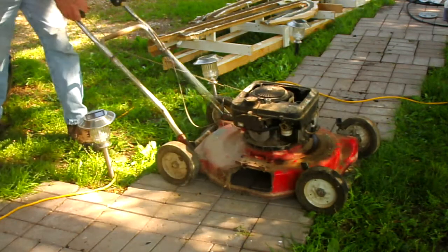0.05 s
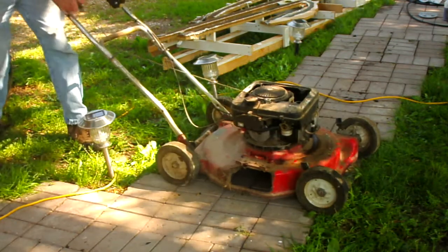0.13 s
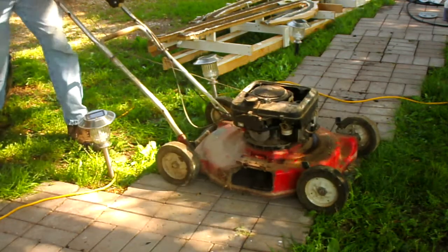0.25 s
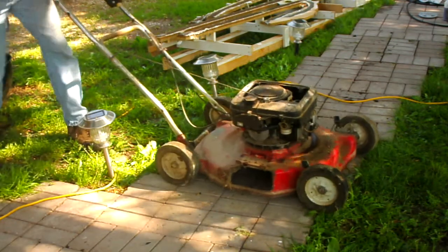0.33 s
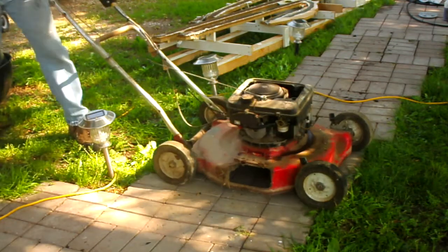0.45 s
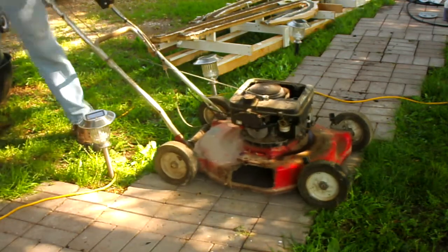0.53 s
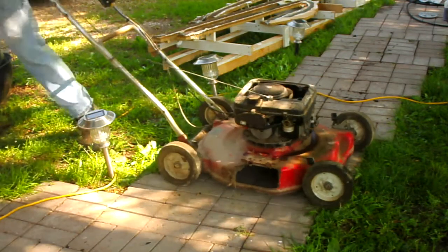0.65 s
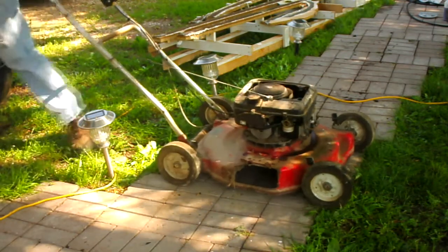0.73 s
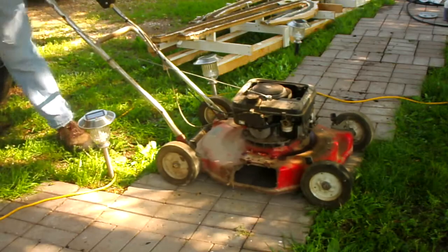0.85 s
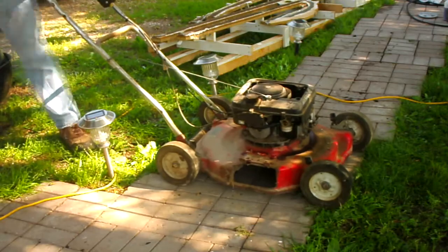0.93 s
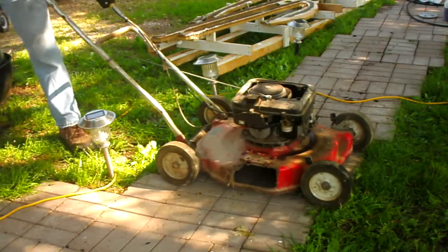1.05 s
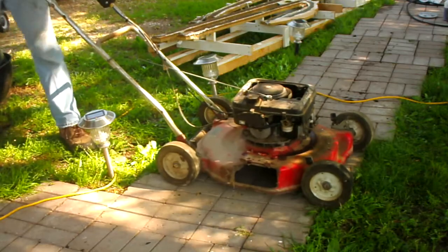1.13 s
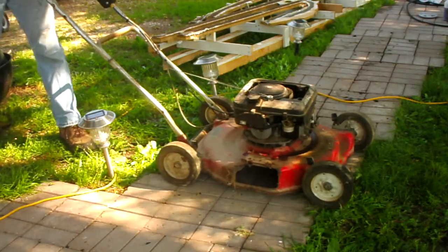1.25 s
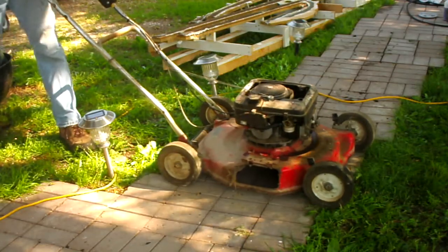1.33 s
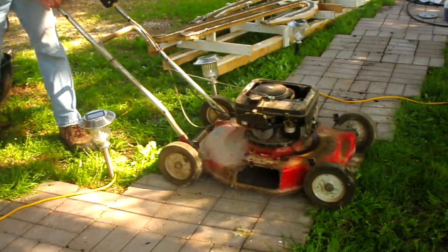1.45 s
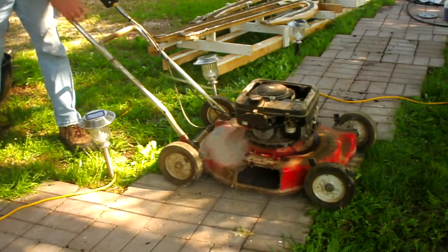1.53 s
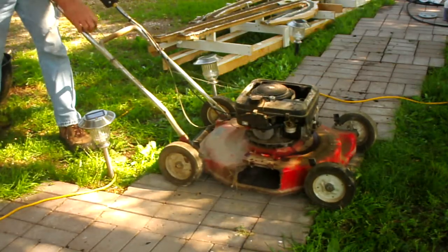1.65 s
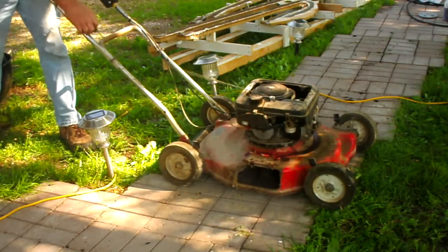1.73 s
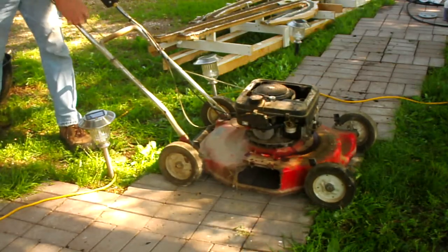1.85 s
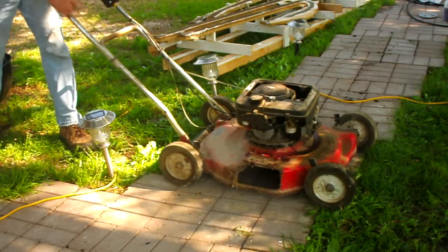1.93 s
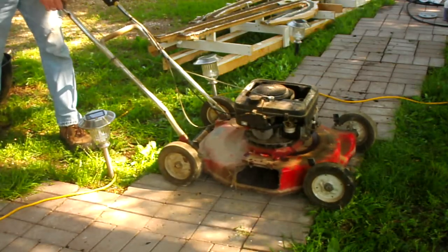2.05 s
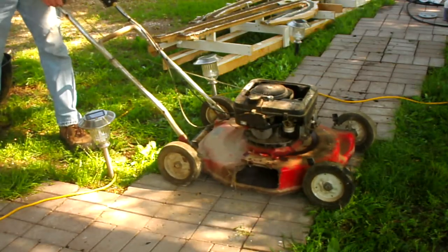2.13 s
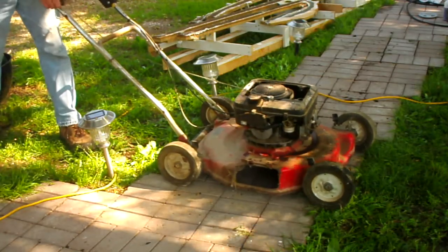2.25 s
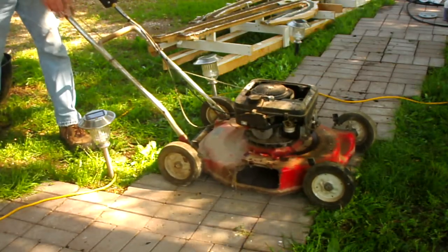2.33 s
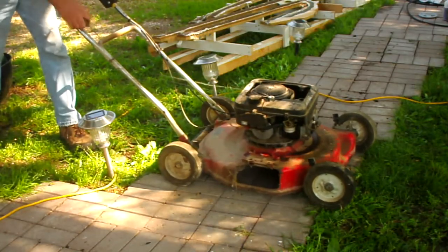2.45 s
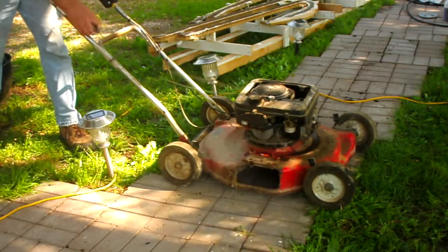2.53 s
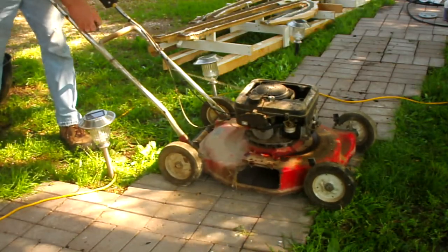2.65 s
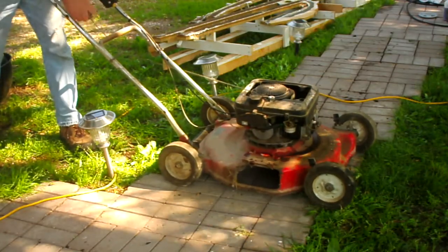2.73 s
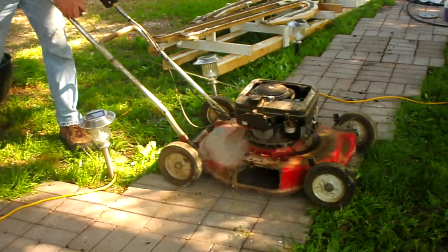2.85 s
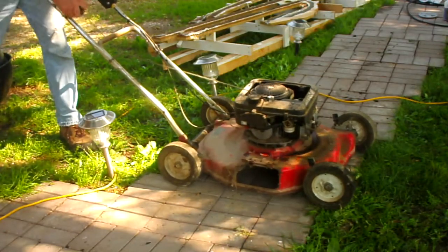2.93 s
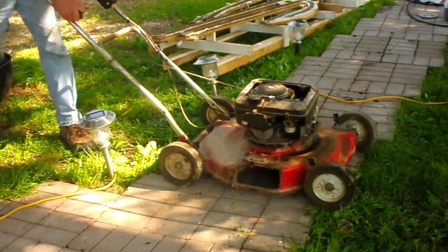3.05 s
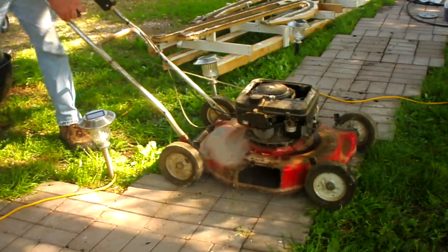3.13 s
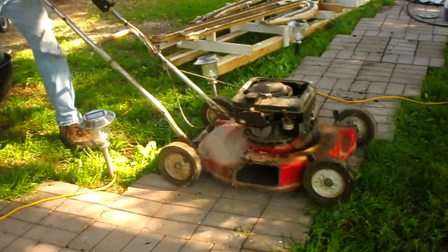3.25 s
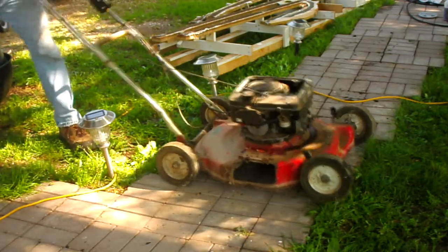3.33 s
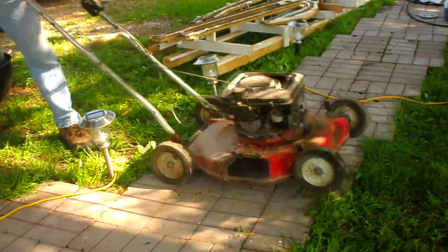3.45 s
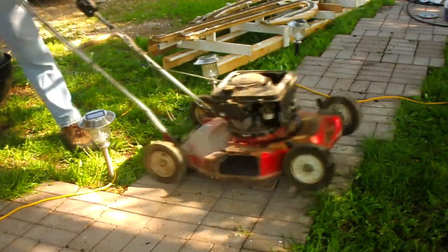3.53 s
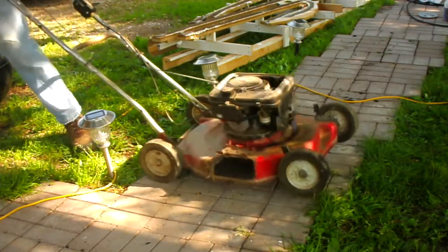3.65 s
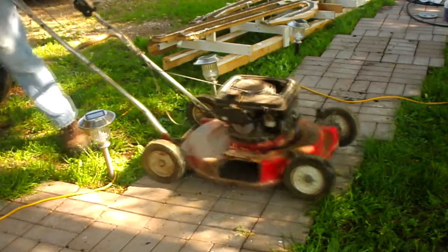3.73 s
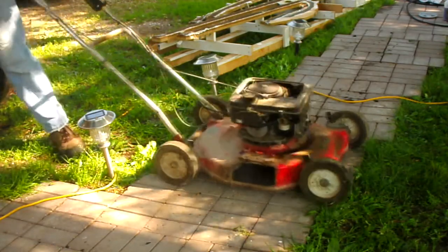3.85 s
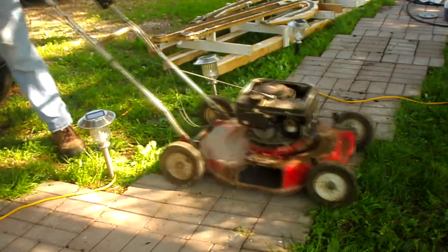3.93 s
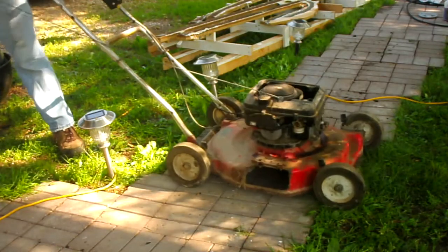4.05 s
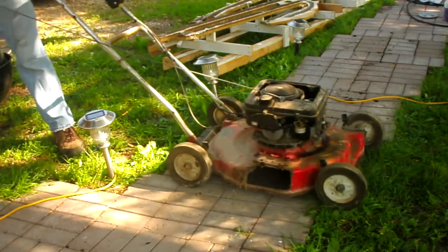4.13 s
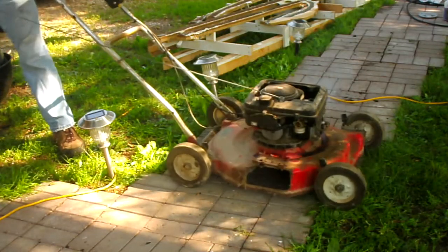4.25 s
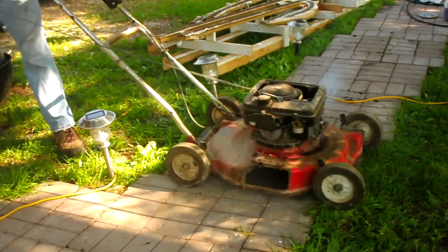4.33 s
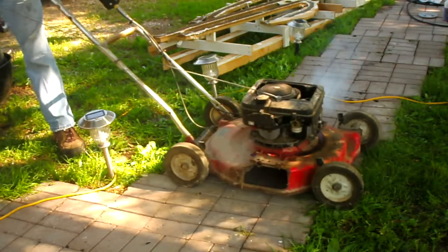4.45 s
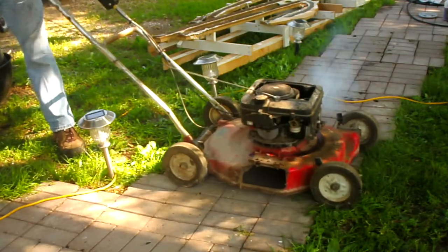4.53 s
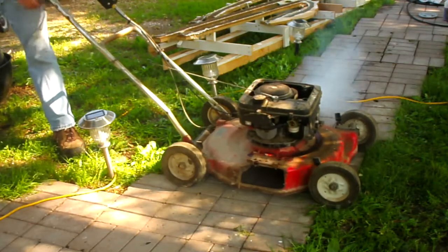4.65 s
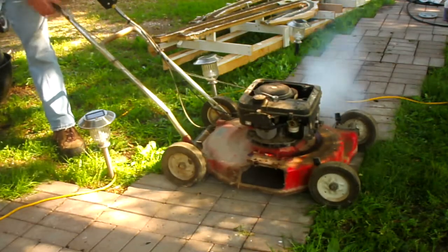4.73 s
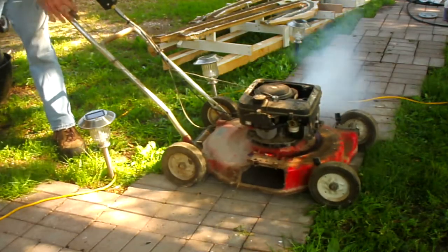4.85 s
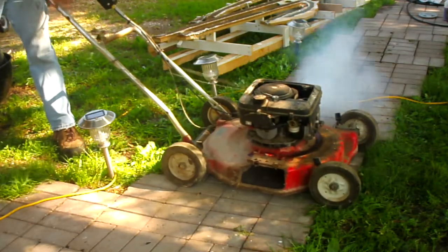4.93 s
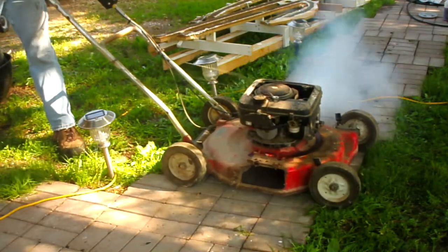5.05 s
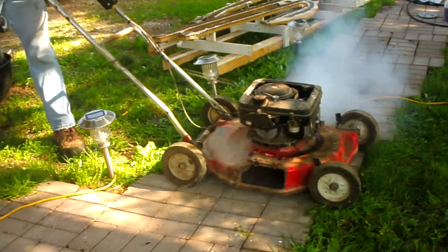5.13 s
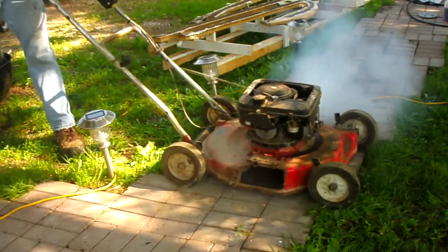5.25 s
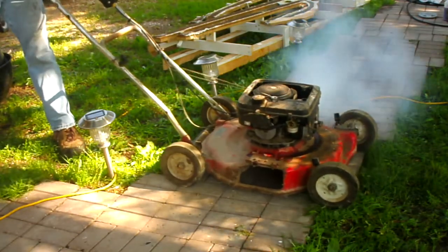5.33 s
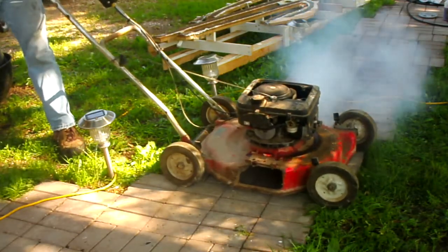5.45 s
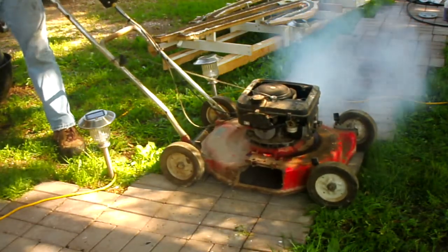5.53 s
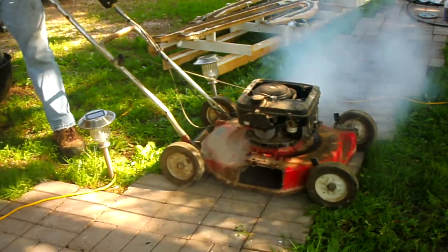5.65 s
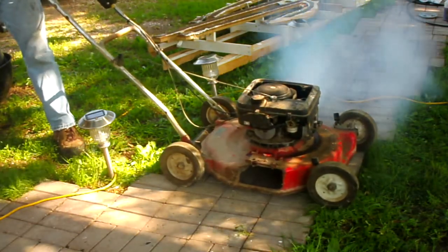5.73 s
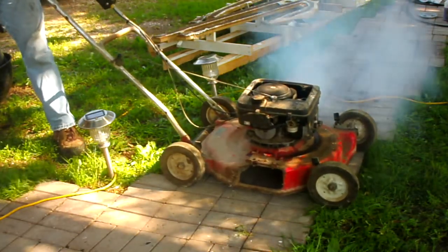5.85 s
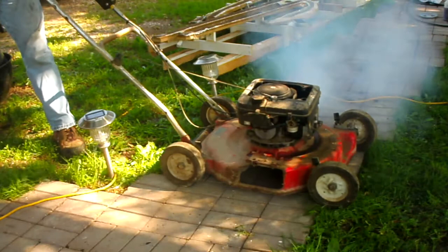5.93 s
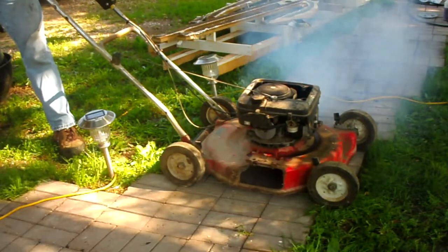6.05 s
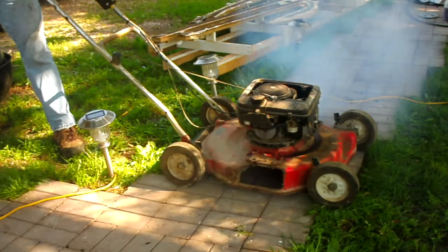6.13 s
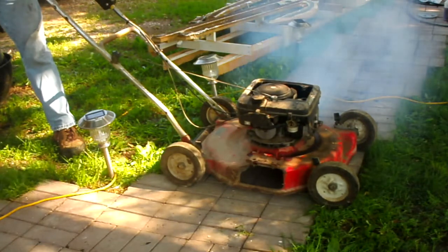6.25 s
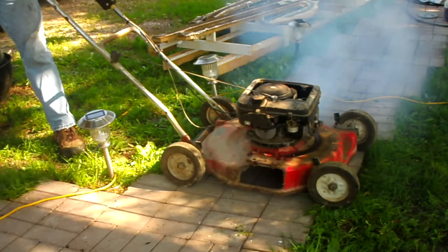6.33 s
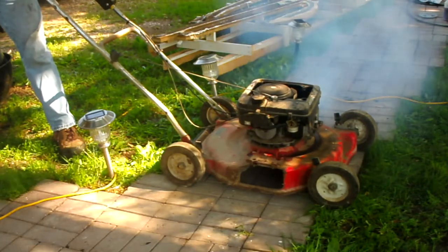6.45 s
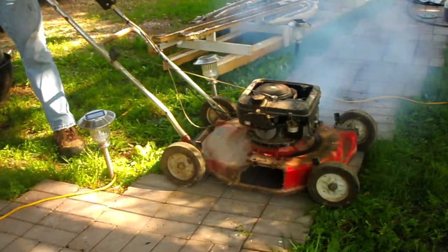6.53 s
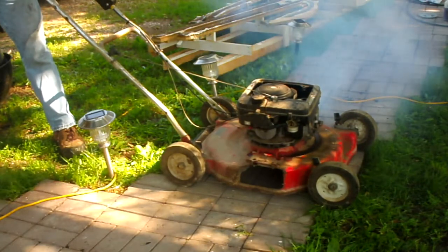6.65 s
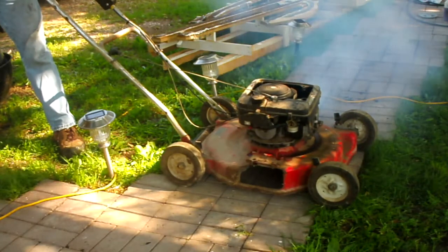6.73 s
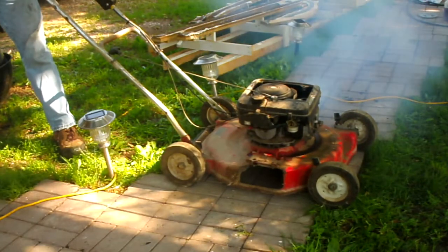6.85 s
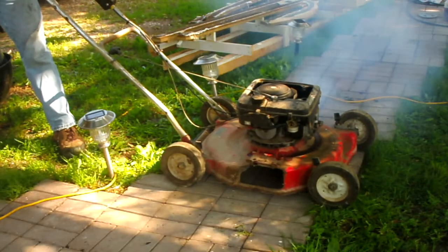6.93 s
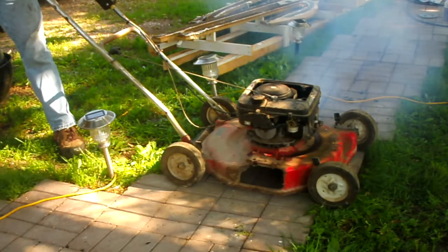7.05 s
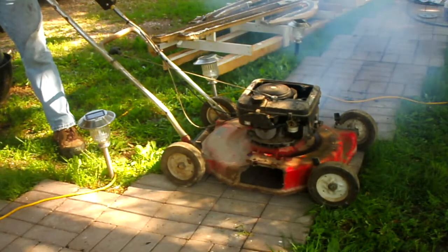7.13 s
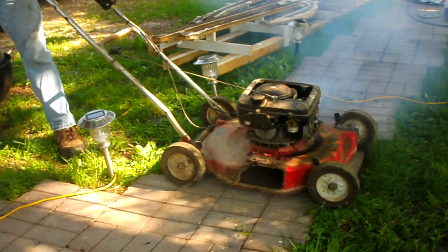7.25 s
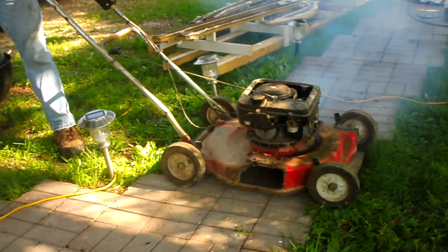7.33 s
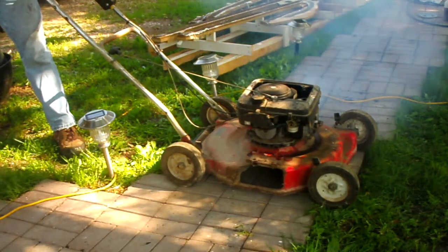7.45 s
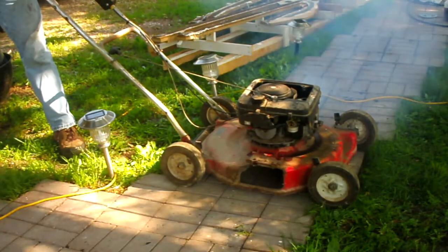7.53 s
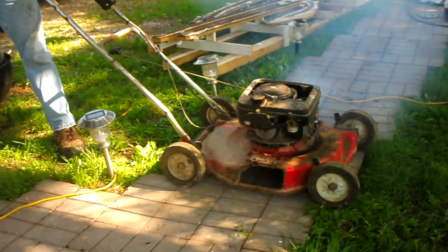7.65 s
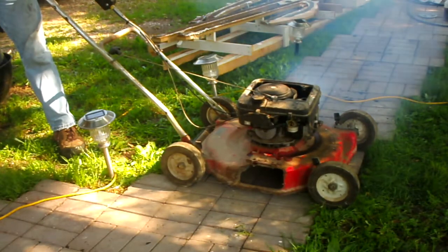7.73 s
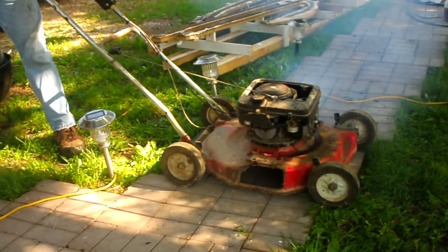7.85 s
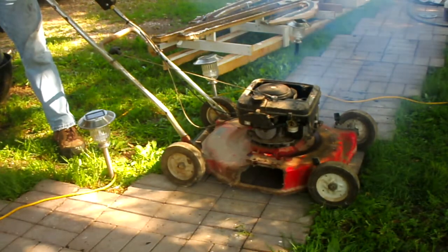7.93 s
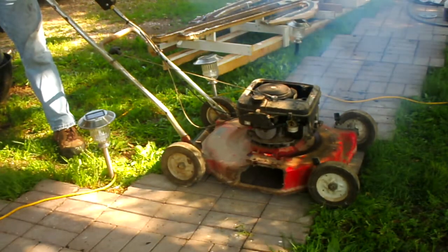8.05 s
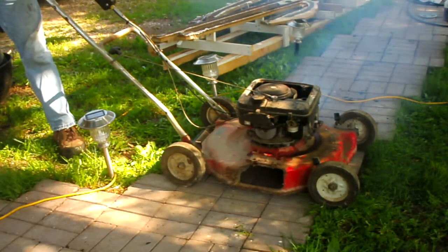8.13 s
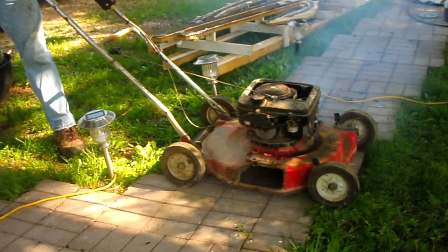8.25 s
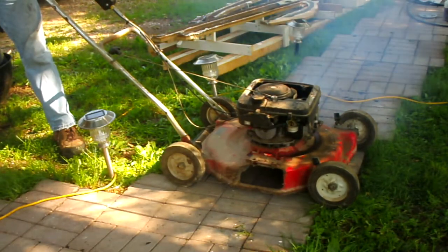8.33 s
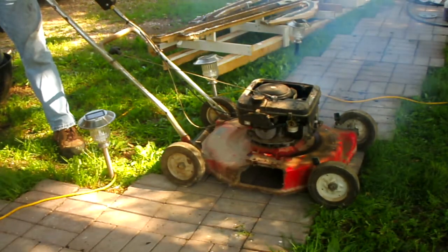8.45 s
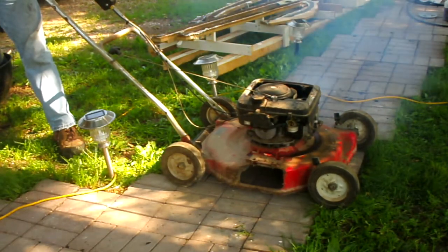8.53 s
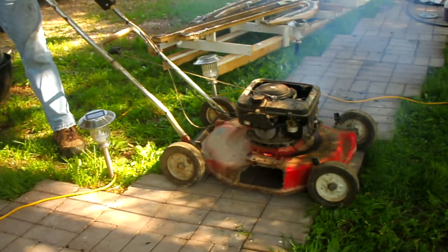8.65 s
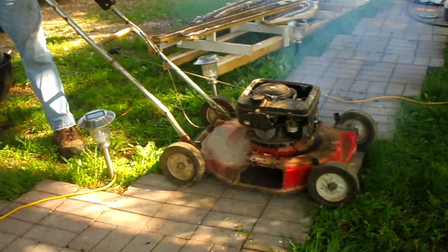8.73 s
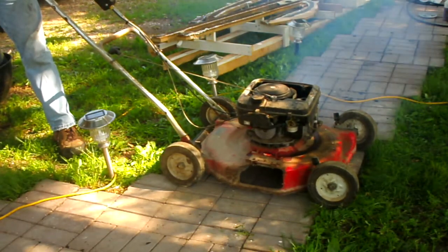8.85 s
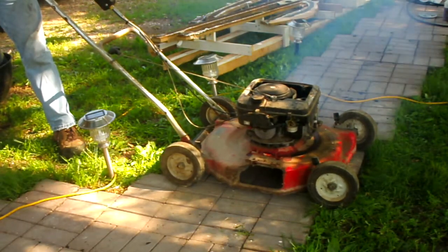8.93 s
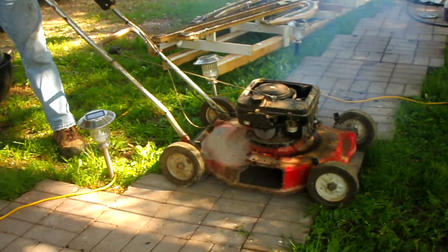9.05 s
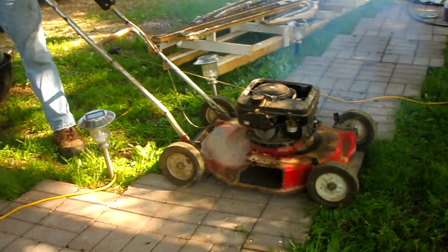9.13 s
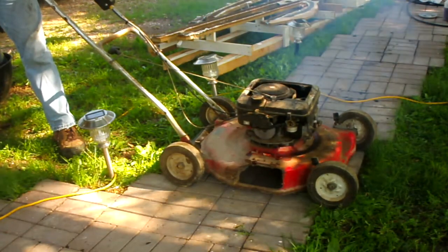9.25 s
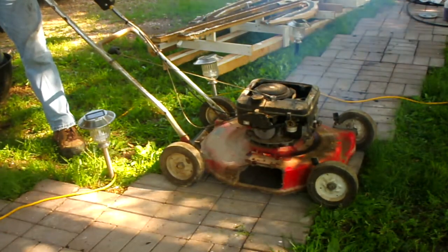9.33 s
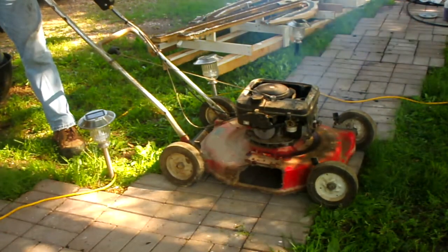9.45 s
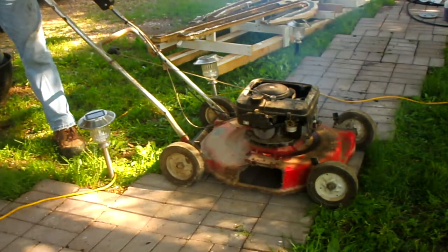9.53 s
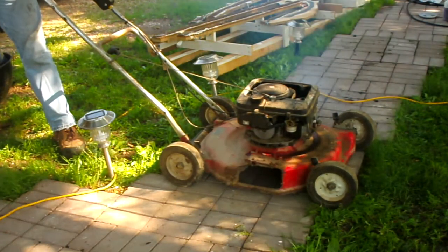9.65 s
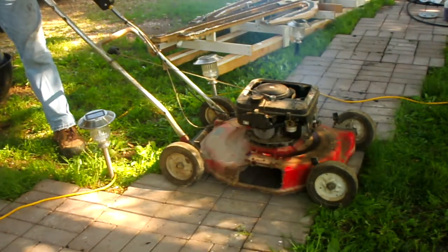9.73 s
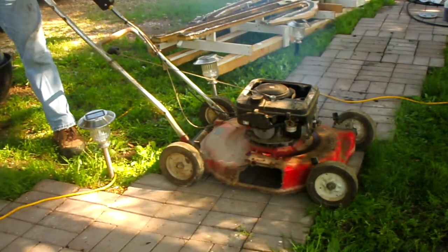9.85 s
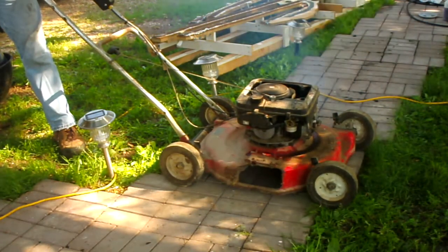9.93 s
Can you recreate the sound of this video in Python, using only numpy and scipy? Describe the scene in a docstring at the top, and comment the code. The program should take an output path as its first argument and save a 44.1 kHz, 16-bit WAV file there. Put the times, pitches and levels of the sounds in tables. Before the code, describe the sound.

Failed pull-start with ratchety rasp and metallic clatter, a quiet pause, then another pull and a mower engine puffs, climbs and drones loudly.

```python
"""A rope rasps and clacks as a petrol lawn mower is pull-started on a paved garden path: the first pull fails.
On the second the single cylinder puffs and runs up to speed, and the blade hums and roars in its deck.
Near the end the beat smooths out and the sound softens; the close microphone overloads a little.
The engine is tones and shaped noise tied to one crank angle; the starter is random tiny contacts and noise
ringing in metal; clacks and thuds are short noise bursts; the garden is quiet coloured noise."""
import sys
import numpy as np
from scipy import signal
from scipy.fft import rfft, irfft
from scipy.io import wavfile

SR = 44100
rng = np.random.default_rng(int(sys.argv[2]) if len(sys.argv) > 2 else 0)


def to_wav(sig):
    """Store sig (one row per channel, or 1-D mono) as 16-bit WAV at the path in sys.argv[1].

    Samples outside -1..1 are clipped; the rate is SR.
    """
    pcm = np.clip(np.atleast_2d(sig), -1, 1) * 32767
    pcm = np.round(pcm).astype(np.int16)
    wavfile.write(sys.argv[1], SR, pcm.T)  # frames by channels


N = 440559
TIME = np.arange(N) / SR
SMOOTH_FROM_S = 9.235   # from here the beat is smoother

# Resonances of the muffler shell. Each row: centre in Hz, width in Hz, peak in dB.
MUFFLER = [(4970, 200, 10), (5745, 300, 11.5), (6490, 113, 9), (6735, 740, 11.5), (7960, 260, 8.5),
           (8550, 200, 8), (9740, 220, 3), (12400, 400, 6), (13800, 370, 8)]


def from_db(db):
    """Turn decibels into gain."""
    return 10 ** (np.asarray(db) / 20)


def rms_one(x):
    """Scale a sound to an rms (average strength) of one."""
    return x / np.sqrt(np.mean(x ** 2) + 1e-20)


def drift(rate):
    """Random wandering with unit rms: straight lines between rate points a second, still after 4000 points."""
    return rms_one(np.interp(TIME * rate, np.arange(4000), rng.standard_normal(4000)))


def colour(x, spectrum, resonances=()):
    """Give a sound a broad spectrum with resonant peaks on it, at unit rms."""
    hz = np.arange(N // 2 + 1) * SR / N
    points = np.array(spectrum)
    level_db = np.interp(np.log(hz + 1), np.log(points[:, 0]), points[:, 1])
    for centre, width, peak_db in resonances:
        level_db = level_db + peak_db / (1 + (2 * (hz - centre) / width) ** 2)
    return rms_one(irfft(rfft(x) * from_db(level_db), N))


def noise(spectrum, resonances=()):
    """Random noise, as moving air makes, with a chosen spectrum."""
    return colour(rng.standard_normal(N), spectrum, resonances)


def resonate(x, hz, width_hz):
    """Ring at one pitch, with about unit gain at the peak; a narrower resonance rings longer."""
    r = np.exp(-np.pi * width_hz / SR)
    top = np.array([1, 0, -1]) * (1 - r * r) / 2
    return signal.lfilter(top, [1, -2 * r * np.cos(2 * np.pi * hz / SR), r * r], x)


def cut(x, hz, kind, order=2):
    """Keep what lies above ("high") or below ("low") a frequency."""
    return signal.sosfilt(signal.butter(order, min(hz, .45 * SR), kind, fs=SR, output="sos"), x)


def low_part(x, hz):
    """Keep the lows without delay, by filtering forwards and then backwards."""
    return cut(cut(x, hz, "low")[::-1], hz, "low")[::-1]


def fade(x, time_s):
    """Let each impulse die away exponentially."""
    return signal.lfilter([1], [1, -np.exp(-1 / (time_s * SR))], x)


def add(out, s, sound):
    """Mix a sound in at time s."""
    at = int(s * SR)
    out[at:at + len(sound)] += sound[:N - at]


def grains(per_s, spread_db):
    """Tiny contacts at random moments, of uneven size when spread_db is above zero."""
    size = from_db(spread_db * np.minimum(rng.exponential(1, N), 4))
    return (rng.random(N) < per_s / SR) * size * rng.choice([-1, 1], N) + 1e-18


def housing(x):
    """The steel housing rings at its resonances."""
    # Each row: centre in Hz, width in Hz, peak in dB over a direct sound at 0 dB.
    steel_modes = [(1100, 240, 4.5), (1580, 170, 4.5), (1980, 150, 8), (3280, 1600, 7), (4100, 150, 5.5),
                   (4760, 360, 3.5), (6000, 1200, 6), (7420, 250, 3)]
    return sum((from_db(db) - 1) * resonate(x, centre, width) for centre, width, db in steel_modes)


def background(garden_db=-43, hiss_db=-49, whine_hz=7867, whine_db=-45.5):
    """Quiet outdoor air and a hiss are coloured noise; a thin whine is one steady tone."""
    # Outdoor air. Each row: frequency in Hz, relative level in dB.
    air_spectrum = [(18, -39), (30, -7.5), (218, -3), (250, -4.5), (474, -5), (609, -6), (668, -7.5),
                    (783, -6), (7000, -24.5), (9100, -56), (15400, -120)]
    air = noise(air_spectrum)
    hiss = noise([(100, -15), (3000, 4.5), (8000, 0.5), (11000, -1.5), (15500, -6)])
    whine = np.sin(2 * np.pi * whine_hz * TIME)
    return from_db(garden_db) * air + from_db(hiss_db) * hiss + from_db(whine_db) * whine


def bumps(t60=0.09, width_share=0.39):
    """Feet and wheels bump softly: noise falling 60 dB in t60 seconds rings at one hollow pitch."""
    # Each row: start in seconds, peak in dB, pitch in Hz.
    soft_bumps = [(.285, -38, 90), (.535, -28, 200), (0.797, -33, 147), (2.25, -38, 100), (2.325, -34, 130),
                  (4.036, -38, 130)]
    out, t = np.zeros(N), TIME[:SR // 4]
    for s, db, hz in soft_bumps:
        burst = rng.standard_normal(len(t)) * from_db(-60 * t / t60)
        thud = cut(resonate(burst, hz, width_share * hz), 2 * hz, "low")
        add(out, s, from_db(db) * thud / np.abs(thud).max())
    return out


def contact(peak_db, hz, t60, broad_db, top_hz,
            rise_s=0.00061, ring_share=0.19, tail_db=-24, tail_t60=0.46, low_hz=620):
    """A contact chatters briefly in the housing, strongest near its own ring; the yard returns a faint tail."""
    t = TIME[:SR // 2]
    decay = from_db(-60 * t / t60) + from_db(tail_db - 60 * t / tail_t60)
    chatter = rng.standard_normal(len(t)) * (1 - np.exp(-t / rise_s)) * decay
    steel = chatter + housing(chatter)
    ring = 2 * resonate(steel, hz, ring_share * hz)
    broad = from_db(broad_db) * cut(steel, low_hz, "high")
    hit = cut(ring + broad, top_hz, "low")
    return from_db(peak_db) * hit / np.abs(hit).max()


def clacks(clack_db=1.5, tick_db=-2, knock_db=-0.2, clack_top_hz=7250):
    """Hard clacks each have their own ring; the ticks are bright and alike, the knocks dull and hollow."""
    # In all three tables the peak is relative: the kind's own dB setting above is added to it.
    # Pawls, handle and shaking engine. Each row: start in seconds, relative peak in dB, main ring in Hz,
    # time to fall 60 dB in seconds, broad chatter in dB.
    hard_clacks = [(.2375, -2.5, 1930, 0.072, 7), (.7322, 0.5, 2920, 0.048, 21),
                   (1.389, -21.5, 2900, 0.12, 5), (1.953, -20, 1210, .09, -5),
                   (3.159, -22, 1970, 0.046, -9), (3.2385, -3, 1680, 0.079, 1),
                   (3.7836, 0, 1430, 0.051, 11), (3.812, -1.5, 3000, 0.037, 2), (3.822, -7, 2950, .035, 10),
                   (4.397, -9.5, 1390, 0.05, -2), (4.521, -12, 7000, 0.13, -12),
                   (4.562, -5, 1540, 0.079, 4), (4.654, -13, 2500, .053, -1), (4.713, -7.5, 4020, .06, -2)]
    # Light ticks of the recoil ratchet. Each row: start in seconds, relative peak in dB.
    ratchet_ticks = [(.4515, -19), (.701, -13), (.801, -18), (.838, -26), (0.916, -17), (1.047, -18.5),
                     (1.223, -20.5), (1.447, -23), (1.718, -20), (1.884, -22), (2.414, -23), (2.743, -21.5),
                     (3.021, -30), (3.474, -17.5), (3.688, -14.5), (3.771, -11)]
    # Knocks of the handle on the deck. Each row: start in seconds, relative peak in dB, ring in Hz.
    handle_knocks = [(.643, -14, 1060), (.658, -18, 1360), (0.857, -14, 1400), (.943, -24, 1400),
                     (1.069, -23.5, 1900), (1.13, -20.5, 1220), (1.667, -28, 1240), (2.364, -30, 1130),
                     (2.812, -24, 1130)]
    out = np.zeros(N)
    for s, db, hz, t60, broad_db in hard_clacks:
        add(out, s, contact(db + clack_db, hz, t60, broad_db, clack_top_hz))
    for s, db in ratchet_ticks:
        add(out, s, contact(db + tick_db, hz=2700, t60=0.057, broad_db=2, top_hz=11100))
    for s, db, hz in handle_knocks:
        add(out, s, contact(db + knock_db, hz, t60=0.062, broad_db=-13, top_hz=4970))
    return out


def pulling(steepness):
    """The strength of each pull on the rope rises and falls in one arch."""
    # Each row: start in seconds, length in seconds, relative level in dB at the top of the arch.
    rope_pulls = [(0.249, .64, -26.5), (3.214, 0.8, -31)]
    total = 0
    for s, length, db in rope_pulls:
        done = np.clip((TIME - s) / length, 0, 1)
        total = total + from_db(db) * np.abs(np.sin(np.pi * done)) ** steepness
    return total


def rewinding(edge_s=0.039, sag_db_per_s=9):
    """The spring draws the rope back in, in fits and starts: each begins quickly, slackens and stops."""
    # Each row: start in seconds, length in seconds, relative level in dB before the sag.
    spring_rewinds = [(0.737, .12, -43), (0.912, 0.27, -40.5), (1.2, .19, -43), (1.412, 0.23, -46),
                      (3.836, .87, -39.5)]
    total = 0
    for s, length, db in spring_rewinds:
        sagging = from_db(db - sag_db_per_s * np.clip(TIME - s, 0, length))
        edges = np.clip(np.minimum(TIME - s, s + length - TIME) / edge_s, 0, 1)
        total = total + sagging * edges
    return total


def pulley_hum(hz=358, width_hz=32, turns_per_s=10.0, throb_db=4, pull_db=-19, rewind_db=-6):
    """The spinning pulley hums hollowly, as noise in a narrow resonance, and throbs once a turn."""
    hum = resonate(resonate(rng.standard_normal(N), hz, width_hz), hz, width_hz)
    throb = from_db(throb_db * np.cos(2 * np.pi * turns_per_s * TIME))
    motion = from_db(pull_db) * pulling(steepness=0.95) + from_db(rewind_db) * rewinding()
    return rms_one(hum * throb) * motion


def pulley_and_ratchet(grain_db=2.5, rasp_db=-1, ratchet_db=-8, low_hz=1100, top_hz=9000):
    """The pulley rasps with a dense stream of tiny contacts, and sparser pawl contacts tick in the housing."""
    # The rasp. Each row: frequency in Hz, relative level in dB.
    rasp_spectrum = [(40, -28), (130, -0.5), (350, -9.5), (560, -2.5), (900, 0.5), (1400, 2.5), (1900, -6),
                     (3000, 0), (4500, -7), (6500, -9), (9500, -22), (15500, -21)]
    # Resonances of deck and starter pulley. Each row: centre in Hz, width in Hz, peak in dB.
    pulley_modes = [(347, 93, 14), (724, 80, 6.5), (1205, 150, 7.5)]
    rubbing = grains(2600, spread_db=0.0) * from_db(grain_db * drift(90))
    rasp = colour(rubbing, rasp_spectrum, pulley_modes)
    pawls = fade(np.abs(grains(45, spread_db=4.0)), 0.006) * rng.standard_normal(N)
    ratchet = cut(cut(pawls + housing(pawls), low_hz, "high", order=1), top_hz, "low")
    return from_db(rasp_db) * rasp + from_db(ratchet_db) * rms_one(ratchet)


def recoil_spring(width_hz=75):
    """Coils touch at random and jingle at the pitches of the recoil spring."""
    # Each row: pitch in Hz, relative level in dB.
    spring_modes = [(2056, 1), (2708, 3), (3305, -1), (4050, 0), (5030, 2), (5740, 4), (6541, 4),
                    (7100, -4), (7500, 4.5), (8400, 3.5), (8802, -3), (10500, -8), (13300, -9)]
    touches = grains(350, spread_db=4.0)
    return rms_one(sum(from_db(db) * resonate(touches, hz, width_hz) for hz, db in spring_modes))


def cylinder_wheeze():
    """On the failed pull, air squeezed from the unfired cylinder hisses through the muffler."""
    # Each row: middle in seconds, level in dB, time from the middle to about a third in seconds.
    squeezes = [(0.56, -20, 0.012), (.975, -27, 0.016)]
    # The hiss. Each row: frequency in Hz, relative level in dB.
    wheeze_spectrum = [(300, -20), (2500, -1), (5000, 1), (7000, -7), (10000, -4), (15500, -14)]
    swell = sum(from_db(db) * np.exp(-((TIME - s) / half) ** 2) for s, db, half in squeezes)
    return swell * noise(wheeze_spectrum, MUFFLER)


def starter(spring_pull_db=-11, spring_rewind_db=0.5, rope_rewind_db=1.0):
    """Rope motion drives the rasp, ratchet and spring; the cylinder wheezes apart from them."""
    rope = pulling(steepness=1.6) + from_db(rope_rewind_db) * rewinding()
    winding = from_db(spring_pull_db) * pulling(steepness=0.72) + from_db(spring_rewind_db) * rewinding()
    return rope * pulley_and_ratchet() + winding * recoil_spring() + cylinder_wheeze()


def clatter(cycle, speed, beat, contact_share=0.074, grain_db=2.0,
            ticks_per_cycle=14, tick_db=-6, tick_ring_db=0, tick_top_hz=6000):
    """Valves and piston chatter at fixed points of the cycle; loose tin ticks faster and more evenly at speed."""
    # The chatter. Each row: frequency in Hz, relative level in dB.
    chatter_spectrum = [(40, -15), (120, 1), (340, 8), (550, -6.5), (1250, 2), (1900, -7.5), (4000, -6.5),
                        (5200, -6.5), (6500, 0), (9000, -7.5), (15500, -16)]
    # Valve gear. Each row: share of the cycle after the exhaust puff, dB above the steady chatter.
    valve_contacts = [(.14, 6), (.32, 10), (.62, 8.5), (.86, 9)]
    gear_db = 0
    for share, db in valve_contacts:
        distance = (cycle - share + .5) % 1 - .5
        gear_db = gear_db + db * np.exp(-(distance / contact_share) ** 2)
    stroke = from_db(beat * gear_db)
    gear = rms_one(noise(chatter_spectrum) * stroke * from_db(beat * grain_db * drift(260)))
    unevenness_db = np.interp(speed, [12, 22], [4, 3])
    touches = np.abs(grains(ticks_per_cycle * speed, unevenness_db)) * stroke * from_db(-2 * unevenness_db)
    buzz = fade(touches, 0.0032) * rng.standard_normal(N)
    ticks = rms_one(cut(from_db(tick_ring_db) * housing(buzz) + buzz, tick_top_hz, "low", order=1))
    return gear + beat * from_db(tick_db) * ticks


def piston_knock(cycle, speed, knock_at=.395, uneven_db=2, length_s=0.0069, ring_hz=4000, ring_width_hz=600,
                 low_hz=2650, low_width_hz=500, block_hz=1400, block_width_hz=700, block_db=-1):
    """Once a cycle the loose piston raps the cylinder wall, harder on some strokes than on others."""
    stroke, share = np.divmod(cycle - knock_at, 1)
    uneven = np.clip(rng.standard_normal(256), -2, 2)[stroke.astype(int) % 256]
    age_s = share / speed
    rap = rng.standard_normal(N) * from_db(uneven_db * uneven) * np.exp(-age_s / length_s)
    ring = resonate(rap, ring_hz, ring_width_hz) + resonate(rap, low_hz, low_width_hz)
    return rms_one(ring + from_db(block_db) * resonate(rap, block_hz, block_width_hz))


def cough(cycle, speed, opens_at=.86, length_s=0.0077, low_hz=600, top_hz=1700):
    """As the exhaust valve cracks open, the burnt charge coughs out just ahead of the hiss."""
    age = (cycle - opens_at) % 1 / speed / length_s   # time since opening, in cough lengths
    burst = rng.standard_normal(N) * np.sqrt(age) * np.exp(-age)
    return rms_one(cut(cut(burst, low_hz, "high"), top_hz, "low"))


def exhaust(cycle, speed, beat, open_share=0.14, widening=0.58, uneven_db=1.0, smooth_share=0.6,
            lazy_top_hz=11000, bright_per_s=9.6, brightening_per_s=3):
    """The open exhaust valve hisses once a cycle; slow puffs are duller, fast ones fill more of the cycle."""
    # The hiss. Each row: frequency in Hz, relative level in dB.
    puff_spectrum = [(200, -20), (1200, -3.5), (2500, -3.5), (4400, 0.5), (6000, -1.5), (8000, -0.5),
                     (10500, 3.5), (13000, -3.5), (15500, -7)]
    nearest = np.round(cycle)
    half_width = open_share * (speed / speed.max()) ** widening
    puff = 1 / np.sqrt(1 + (np.abs(cycle - nearest) / half_width) ** 8)
    strength = from_db(uneven_db * rng.standard_normal(256)[nearest.astype(int) % 256])
    hiss = noise(puff_spectrum, MUFFLER)
    dull = low_part(hiss, lazy_top_hz)
    lazy = np.clip((bright_per_s - speed) / brightening_per_s, 0, 1)
    return (hiss + lazy * (dull - hiss)) * (beat * puff * strength + (1 - beat) * smooth_share)


def blade_roar(cycle, beat, swell_db=2.5, slap_db=5.5, pass_at=0.18, slap_at=0.274, split_hz=1000, eddy_db=0.9):
    """Churned air swells with each blade pass; its lower part slaps, with a second beat twice as fast."""
    # The roar. Each row: frequency in Hz, relative level in dB.
    roar_spectrum = [(30, -36), (70, -33.5), (130, -26), (250, -1.5), (400, -4.5), (560, 0.5), (700, -7),
                     (850, -0.5), (1050, -3), (1480, 2), (2100, -2.5), (2800, -5), (4000, -9),
                     (15500, -28.5)]
    # Resonances of the blade deck. Each row: centre in Hz, width in Hz, peak in dB.
    deck_modes = [(239, 48, -4), (500, 70, 1.5), (880, 42, 2.5), (1455, 64, 4), (1850, 270, 1.7),
                  (2640, 300, 3)]
    air = noise(roar_spectrum, deck_modes)
    low = low_part(air, split_hz)
    passing = 8 * np.pi * (cycle - pass_at)   # four blade passes a cycle
    slapping = 8 * np.pi * (cycle - slap_at)
    swell = from_db(beat * (swell_db * np.cos(passing) + eddy_db * drift(500)))
    slap = from_db(beat * slap_db * (np.cos(slapping) + np.cos(2 * slapping)) / 2)
    return (air - low) * swell + low * slap


def blade_hum(cycle, bite, boom_hz=225, boom_width_hz=45, boom_db=-2.0, jitter=0.0014, waver_db=0.5,
              deck_hz=170, dead_hz=142, dead_width_hz=45, dead_depth=0.4, soft_hz=480,
              ring_hz=520, ring_width_hz=40, ring_db=-3):
    """Tones follow the crank; uneven turning blurs the high ones, and the small deck radiates low ones poorly."""
    # Blade and crank. Each row: multiple of the cycle rate, relative level in dB.
    crank_tones = [(2, -14), (4, -7.5), (5, -8.5), (6, -14.5), (8, -5), (9, -30), (10, -41), (12, -4),
                   (13, -43), (14, -14.5), (15, -17.5), (18, -32), (20, -11.5), (24, -8.5), (28, -14),
                   (32, -10), (34, -15), (36, -7.5), (44, -13.5), (48, -13), (52, -12), (60, -12)]
    angle = 2 * np.pi * (cycle + jitter * drift(45))   # jitter is in cycles
    tones = 0
    for k, db in crank_tones:
        level = from_db(db + waver_db * drift(16))
        tones = tones + level * np.sin(round(k) * angle + rng.uniform(0, 2 * np.pi))
    # the deck booms as the tones sweep through it
    boom = from_db(boom_db) * resonate(tones, boom_hz, boom_width_hz)
    boom = boom + from_db(ring_db) * resonate(tones, ring_hz, ring_width_hz)
    dead = dead_depth * resonate(tones, dead_hz, dead_width_hz)
    tones = cut(tones + boom - dead, deck_hz, "high")
    mellow = 1.35 * cut(tones, soft_hz, "low", order=1)   # a slower or softer beat has weaker overtones
    return bite * tones + (1 - bite) * mellow


def loudness(law, speed, governed_per_s=24.24, throttle_band_per_s=6.4):
    """A part grows louder with speed; its throttle share follows how far speed lies below the governed speed."""
    governed_db, doubling_db, throttle_db, smooth_db = law
    throttle = np.clip((governed_per_s - speed) / throttle_band_per_s, 0, 1)   # 1 is wide open
    speed_db = doubling_db * np.log2(speed / governed_per_s)
    return from_db(governed_db + speed_db + throttle_db * throttle + smooth_db * (TIME >= SMOOTH_FROM_S))


def engine(first_puff_s=3.535, crank_s=3.3, spin_up_s=0.43, late_beat=0.23):
    """All running sounds follow one crank angle, and their levels follow its speed."""
    # Engine speed. Each row: time in seconds, four-stroke cycles per second (a cycle is two turns).
    speed_points = [(3.535, 4.368), (3.8, 6.354), (3.96, 5.936), (4.23, 10.355), (4.62, 12.851),
                    (4.96, 18.854), (5.09, 18.993), (5.46, 21.831), (5.98, 23.741), (6.67, 24.762),
                    (6.89, 23.826), (7.09, 24.318), (7.48, 23.676), (8.33, 24.105), (8.52, 23.637),
                    (8.91, 24.115), (9.2, 23.738), (9.99, 23.636)]
    # How loud each part is, before the swell at the start. Each holds: relative level in dB at governed speed,
    # dB per doubling of speed, dB added at open throttle, dB added once the beat smooths.
    hum_law = (-15.5, 27, 1.7, -1.2)
    roar_law = (-12.5, 18.5, -1, -5)
    clatter_law = (-25.5, 7.5, 5.5, 0.5)
    knock_law = (-36, 8, 9, -14)
    cough_law = (-25.5, 9, 1.5, -9)
    exhaust_law = (-16, 3.5, 5.5, -8.5)
    times, rates = np.transpose(speed_points)
    speed = np.interp(TIME, times, rates)
    cycle = np.cumsum(speed) / SR
    cycle = cycle - np.interp(first_puff_s, TIME, cycle)
    beat = np.where(TIME < SMOOTH_FROM_S, 1, late_beat)   # how strongly the strokes stand out
    turning = np.clip((TIME - crank_s) / spin_up_s, 0, 1)   # the rope turns the crank and the sounds swell in
    bite = beat * (speed / speed.max()) ** 2
    running = loudness(clatter_law, speed) * clatter(cycle, speed, beat)
    running += loudness(knock_law, speed) * piston_knock(cycle, speed)
    running += loudness(cough_law, speed) * cough(cycle, speed)
    running += loudness(exhaust_law, speed) * exhaust(cycle, speed, beat)
    running += loudness(roar_law, speed) * blade_roar(cycle, beat)
    running += loudness(hum_law, speed) * blade_hum(cycle, bite)
    return turning * running


def scene():
    """The mower in the garden, in one channel."""
    return (background() + bumps() + clacks() + pulley_hum() + starter() + engine())[None]


def record(dry, top=1.0, cutoff_hz=15900):
    """The overloaded microphone rounds off the highest peaks, and the extreme treble is cut."""
    clipped = dry / (1 + (dry / top) ** 8) ** (1 / 8)
    return signal.sosfilt(signal.ellip(12, .1, 80, cutoff_hz, fs=SR, output="sos"), clipped)


dry = scene()
out = record(dry)
to_wav(out)
```